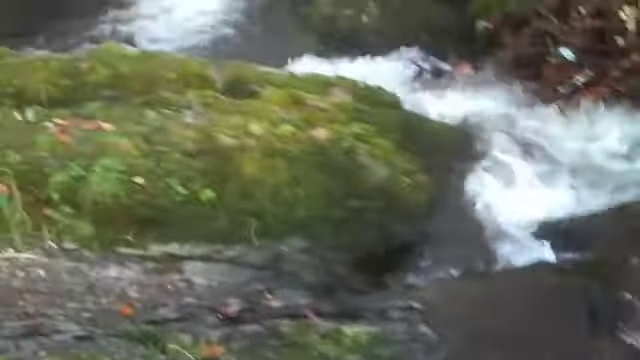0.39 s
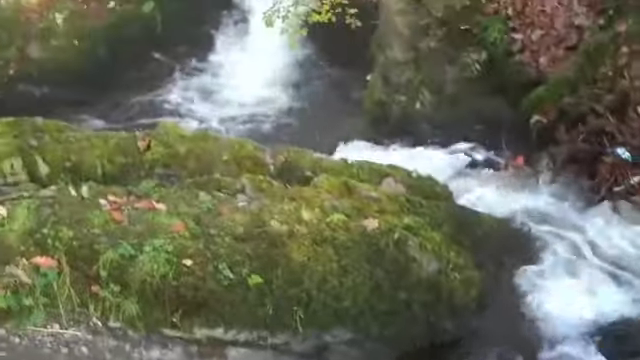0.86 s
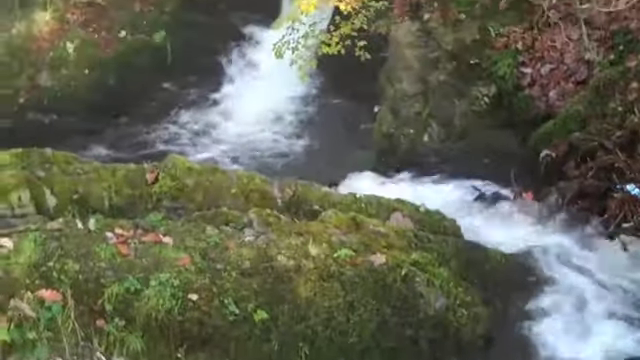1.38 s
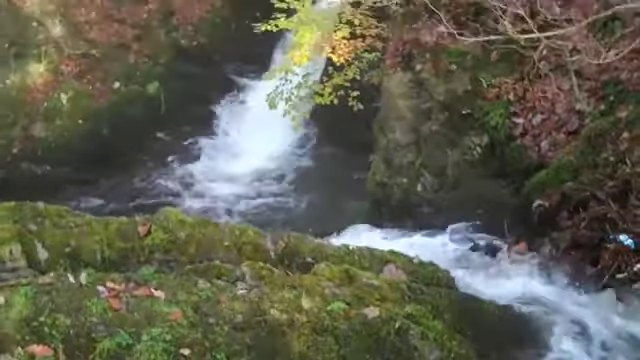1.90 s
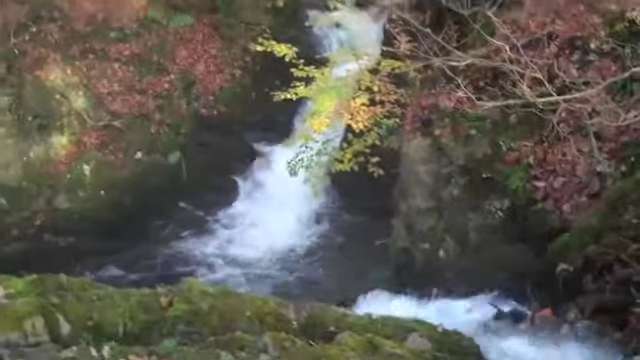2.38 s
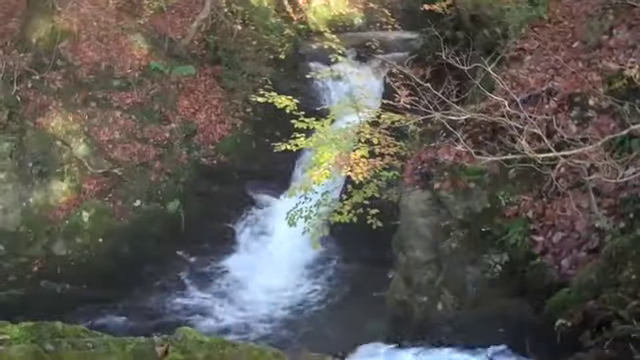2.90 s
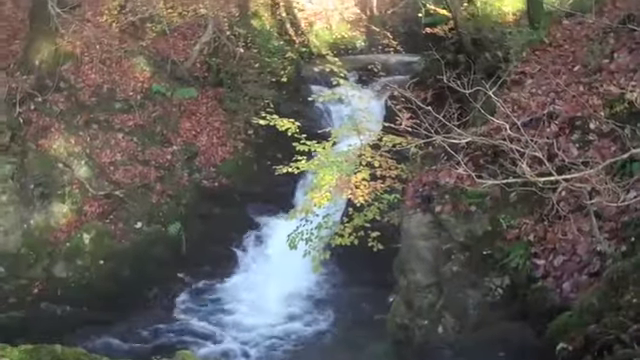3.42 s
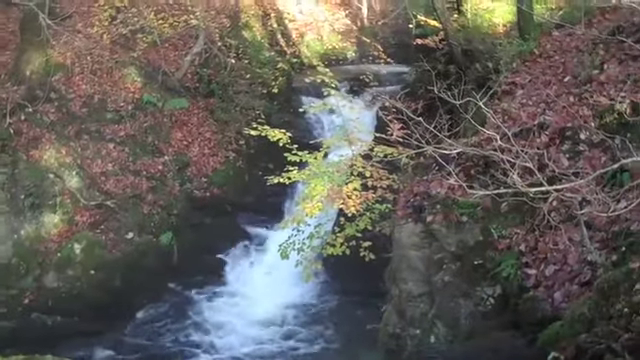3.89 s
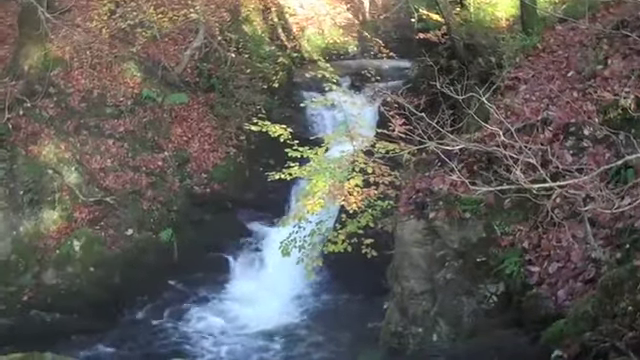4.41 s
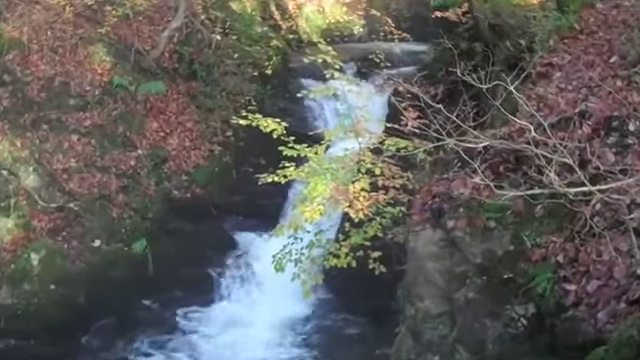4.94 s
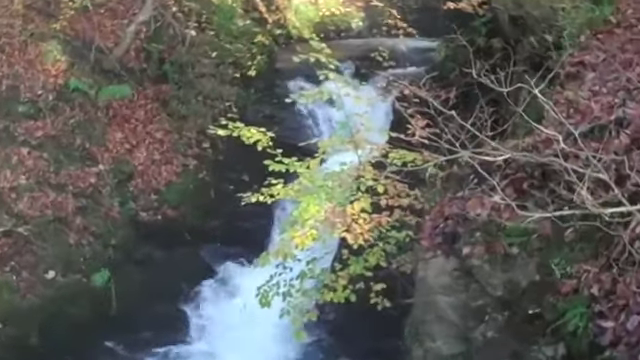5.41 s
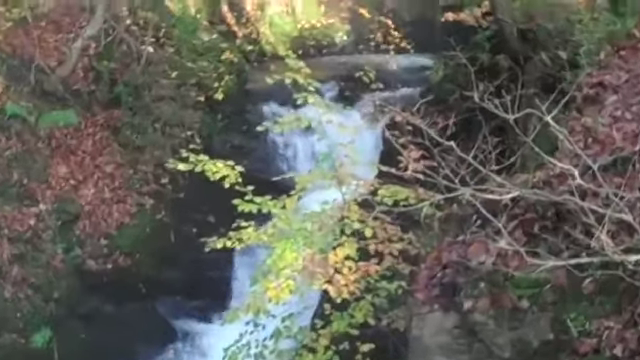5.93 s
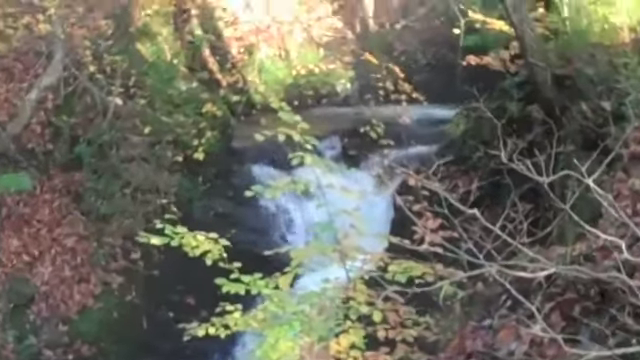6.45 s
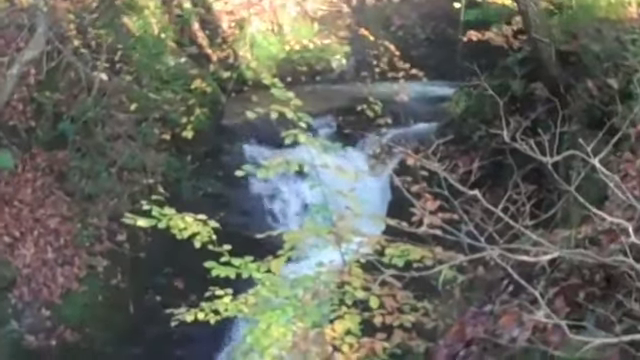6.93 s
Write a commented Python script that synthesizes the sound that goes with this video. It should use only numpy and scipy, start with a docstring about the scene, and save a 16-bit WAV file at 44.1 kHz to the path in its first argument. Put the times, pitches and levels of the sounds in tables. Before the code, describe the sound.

A small woodland waterfall roars steadily while nearer rapids fizz and gurgle over rocks, the fizz easing slightly as attention turns to the fall.

```python
"""A small waterfall roars steadily in a wooded gully while nearer rapids fizz and gurgle over rocks.
One microphone turns slowly from the rapids up to the fall, and the rapids fade a little.
Roar and low churn are noise with drifting spectra; fizz and gurgle are many short rising bubble rings.
Slow sampling mirrors the treble above half the sampling rate. Both channels carry the same sound."""
import sys
import numpy as np
from scipy import signal
from scipy.fft import rfft, irfft, next_fast_len
from scipy.io import wavfile
from scipy.ndimage import uniform_filter1d

SR = 44100
rng = np.random.default_rng(int(sys.argv[2]) if len(sys.argv) > 2 else 0)


def bounce(signal):
    """Save signal as a 16-bit WAV file at the path given by the first command-line argument."""
    frames = np.transpose(np.atleast_2d(signal))
    limited = np.clip(frames, -1, 1)
    pcm = np.round(limited * 32767).astype(np.int16)
    wavfile.write(sys.argv[1], SR, pcm)


def gain_from_db(level_db):
    """Turn a decibel level (scalar or array-like) into a linear amplitude factor."""
    decades = np.asarray(level_db, float) / 20
    return 10 ** decades


N = 311787  # length (samples)
SAMPLING_HZ = 16000  # the slow sampling of the microphone signal


def evened(x):
    """Scales to rms 1."""
    return x / np.sqrt(np.mean(x ** 2) + 1e-20)


def read(points, hz):
    """Straight lines on a log-frequency axis."""
    point_hz, value = np.transpose(points)
    return np.interp(np.log(hz + 1), np.log(point_hz + 1), value)


def turned():
    """How far the microphone has tilted from the rapids (0) to the fall (1)."""
    middle_s, time_scale_s = 2.45, 0.35
    t = np.arange(N) / SR
    return 0.5 + 0.5 * np.tanh((t - middle_s) / time_scale_s)


def swells_db(rows, half_s):
    """Each row is one smooth bump in level, fallen to 1/e of its height half_s from its middle."""
    t = np.arange(N) / SR
    return sum(height_db * np.exp(-((t - middle_s) / half_s) ** 2) for middle_s, height_db in rows)


def rush(colour, patchy_db, shimmer_db, flicker_db, top_hz, size=2048):
    """Random short-time spectra: broad drifting patches, a shimmer of narrow pitches, a flicker shared by all."""
    frames = 4 * N // size + 8
    hz = np.fft.rfftfreq(size, 1 / SR)
    real, imaginary, patches, shimmer = rng.standard_normal((frames, len(hz), 4)).T

    # axis 0 is pitch, axis 1 is time
    patches = uniform_filter1d(patches, size=40, axis=0)
    patches = evened(uniform_filter1d(patches, size=4, axis=1))
    shimmer = uniform_filter1d(shimmer, size=2, axis=0)
    shimmer = evened(uniform_filter1d(shimmer, size=7, axis=1))
    flicker = evened(uniform_filter1d(rng.standard_normal(frames), size=3))

    level_db = read(colour, hz)[:, None]
    field_db = level_db + patchy_db * patches + shimmer_db * shimmer + flicker_db * flicker
    below_top = (hz < top_hz)[:, None]
    spectra = (real + 1j * imaginary) * gain_from_db(field_db) * below_top
    sound = signal.istft(spectra, nperseg=size, noverlap=3 * size // 4)[1]
    return evened(sound[:N])


def bubbles(colour, per_s, cycles, rise, spread_db, count):
    """Trapped air rings briefly and rises in pitch; most bubbles are quiet, a few are loud."""
    out = np.zeros(N)
    for hz in np.geomspace(colour[0][0], colour[-1][0], count):
        turns = np.arange(int(4 * cycles * SR / hz)) * hz / SR  # periods at the starting pitch
        tone = np.sin(2 * np.pi * turns * (1 + rise * turns / cycles))
        ring = tone * np.exp(-turns / cycles) * (1 - np.exp(-turns))  # soft onset, then decay
        when, size = rng.random((N, 2)).T
        starts = when < per_s / count / SR
        train = starts * gain_from_db(-spread_db * np.log(size + 0.0082))
        rings = signal.oaconvolve(train, ring / np.linalg.norm(ring))[:N]
        out += gain_from_db(read(colour, hz)) * rings
    return evened(out)


# Colour of the low churn: pitch_hz (Hz), level_db (relative dB per Hz)
POOL_COLOUR = [(25, -23.5), (33, -27), (60, -27), (100, -17.5), (146, -8), (220, -2.5), (281, -3),
               (450, 0.5)]
# The low churn swells and sinks: middle_s (s), height_db (dB)
POOL_HEAVES = [(1.8, 2), (3.7, -1.4), (4.9, 1.0)]


def pool():
    """The low churn under the fall: deep shimmering noise that heaves slowly."""
    level_db, heave_half_s = -48.0, 0.35
    churn = rush(POOL_COLOUR, patchy_db=0.0, shimmer_db=1.03, flicker_db=-0.4, top_hz=521)
    return gain_from_db(level_db + swells_db(POOL_HEAVES, heave_half_s)) * churn


# Strength of the bursting droplets by pitch: pitch_hz (Hz), level_db (relative dB)
SPRAY_COLOUR = [(1200, -9.5), (2500, -3), (4000, -4.5), (6000, -6.5), (8000, -10.5)]
# Surges of white water in the rapids: middle_s (s), height_db (dB)
RAPIDS_SURGES = [(1.75, 1), (3.45, 1.5), (4.8, 1.5), (5.9, 1.5)]


def rapids():
    """Dense droplets and tiny bubbles burst in the nearer white water, in quick spurts."""
    facing_db, turn_db = -38, -2.5  # level facing the rapids, change by the turn
    surge_half_s, spurt_db = 0.27, 1.3  # spurt_db is an rms swing
    spurts = evened(signal.oaconvolve(rng.standard_normal(N), np.hanning(900), "same"))
    spray = bubbles(SPRAY_COLOUR, per_s=5000, cycles=3.54, rise=0.034, spread_db=0.5, count=24)
    level_db = facing_db + turn_db * turned()
    level_db = level_db + swells_db(RAPIDS_SURGES, surge_half_s) + spurt_db * spurts
    return gain_from_db(level_db) * spray


# Colour of the roar: pitch_hz (Hz), level_db (relative dB per Hz)
ROAR_COLOUR = [(200, -59), (400, -28.5), (470, -11), (520, -2), (640, 0), (800, -1.5), (1070, -1),
               (1500, -0.5), (2200, -3), (3000, -4.5), (3700, -5.5), (5200, -9), (7400, -14.5)]
# Strength of the gurgling air bubbles by pitch: pitch_hz (Hz), level_db (relative dB)
GURGLE_COLOUR = [(500, -3), (650, 1.5), (850, -2.5), (1300, -2), (2400, -5.5)]


def waterfall():
    """The broad roar of the fall is shimmering noise, with ringing air bubbles gurgling in it."""
    facing_db, turn_db = -32.5, -0.15  # roar level facing the rapids, change by the turn
    gurgle_db = -13.5  # relative to the roar
    roar = rush(ROAR_COLOUR, patchy_db=0.36, shimmer_db=2.0, flicker_db=0.1, top_hz=SAMPLING_HZ / 2)
    gurgle = bubbles(GURGLE_COLOUR, per_s=400, cycles=13.2, rise=0.015, spread_db=1.5, count=30)
    return gain_from_db(facing_db + turn_db * turned()) * (roar + gain_from_db(gurgle_db) * gurgle)


def scene():
    """All the water reaches one microphone, heard alike in both channels."""
    return np.tile(waterfall() + rapids() + pool(), (2, 1))


# Smoothing filter after the slow sampling: pitch_hz (Hz), level_db (gain in dB)
SMOOTHING_GAIN = [(7000, 0.5), (7500, 0), (8000, -4), (8500, -15), (9000, -35), (9200, -58), (9500, -90)]


def slow_sampling(sound):
    """Slow sampling mirrors the treble about half its rate; a smoothing filter lets a little through."""
    size = next_fast_len(N)
    hz = np.fft.rfftfreq(size, 1 / SR)
    kept = irfft(rfft(sound, size) * (hz < SAMPLING_HZ / 2), size)
    # a carrier at the sampling rate makes the mirror images
    carrier = np.cos(2 * np.pi * SAMPLING_HZ * np.arange(size) / SR)
    mirrored = kept * (1 + 2 * carrier)
    return irfft(rfft(mirrored) * gain_from_db(read(SMOOTHING_GAIN, hz)), size)[:, :N]


def low_pass(x):
    """Removes everything above the highest recorded frequency."""
    return signal.sosfilt(signal.butter(12, 9230, fs=SR, output="sos"), x)


def record(dry):
    """The microphone signal is sampled slowly and smoothed."""
    mix = slow_sampling(dry)
    return low_pass(mix)


dry = scene()
out = record(dry)
bounce(out)
```